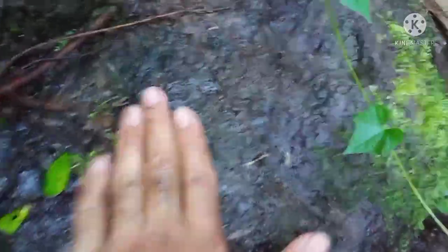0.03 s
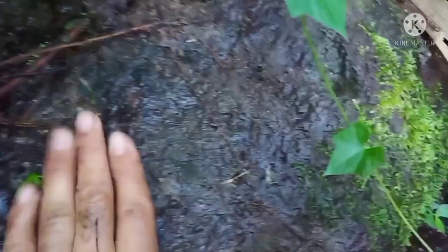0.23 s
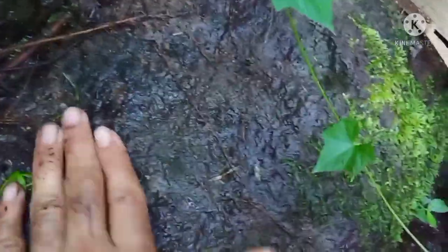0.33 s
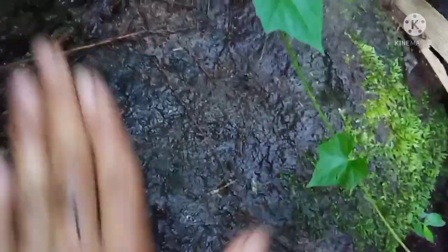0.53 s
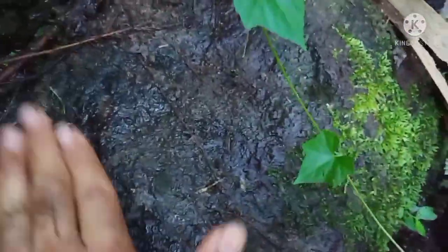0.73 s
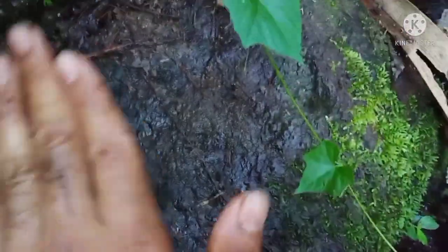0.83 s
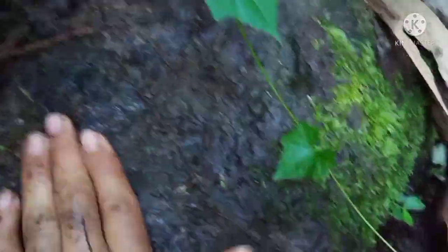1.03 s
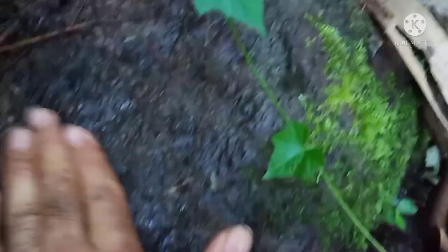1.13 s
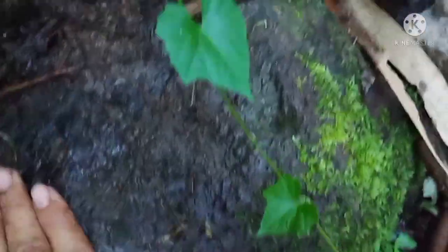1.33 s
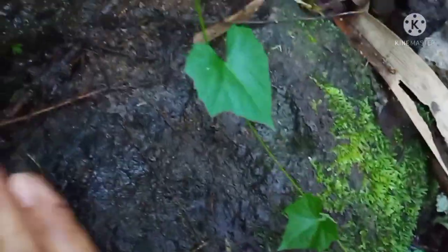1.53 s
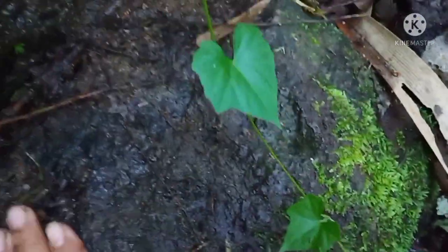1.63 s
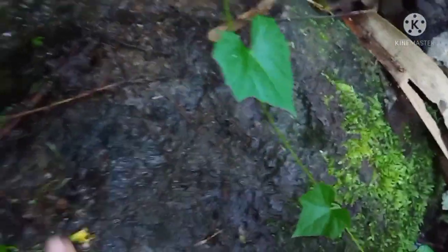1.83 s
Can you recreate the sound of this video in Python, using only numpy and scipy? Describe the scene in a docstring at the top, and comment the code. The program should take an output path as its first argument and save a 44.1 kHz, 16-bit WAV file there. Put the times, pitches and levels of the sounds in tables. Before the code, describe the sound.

A hand pats a wet rock five times over a steady high insect hiss.

```python
"""Insects hiss steadily over faint air, and a soft wet fizz fades out. From a quarter second in,
a flat hand pats a wet rock five times, close by. Each pat squeezes the water film into spatter,
pops a few air pockets and thuds in the palm. Tiny bubbles then crackle, drops tick and the
surroundings answer with a faint tail, while gain control briefly ducks the insects.
After the last pat the fizz swells again."""
import sys
import numpy as np
from scipy import signal
from scipy.fft import rfft, irfft
from scipy.io import wavfile
from scipy.ndimage import uniform_filter1d, minimum_filter1d

SR = 44100
rng = np.random.default_rng(int(sys.argv[2]) if len(sys.argv) > 2 else 0)


def waveform_to_disk(signal):
    """Save audio, clipped to [-1, 1], as 16-bit WAV at the path in sys.argv[1]."""
    frames = np.transpose(np.atleast_2d(signal))
    scaled = np.clip(frames, -1, 1) * 32767
    samples = np.round(scaled).astype(np.int16)
    wavfile.write(sys.argv[1], SR, samples)


N = 83790
TIME = np.arange(N) / SR


def amp(db):
    """Decibels to gain."""
    return 10 ** (np.asarray(db) / 20)


def unit(x):
    """Scales to rms 1."""
    return x / np.sqrt(np.mean(x ** 2) + 1e-20)


def curve(rows, hz, column=1):
    """One column of a table, interpolated along log frequency."""
    table = np.transpose(rows)
    return np.interp(np.log(hz + 1), np.log(table[0] + 1), table[column])


def fader(rows):
    """Gain that rides through points of seconds and dB."""
    return amp(np.interp(TIME, *np.transpose(rows)))


def add(mix, start, sound):
    """Mixes a sound in at a start in seconds."""
    part = mix[max(round(start * SR), 0):][:len(sound)]
    part += sound[:len(part)]


def low_cut(x, hz):
    """Rolls off the bass."""
    return signal.sosfilt(signal.butter(2, hz, "high", fs=SR, output="sos"), x)


def frame(size=4096):
    """Time from 20 ms before a contact, and the matching frequencies."""
    return np.arange(size) / SR - .02, np.fft.rfftfreq(size, 1 / SR)


def swell(t, rise, decay):
    """Builds ever faster up to time zero, then dies away."""
    return np.clip(1 + t / rise, 0, 1) ** 1.8 * np.exp(-np.maximum(t, 0) / decay)


def burst(envelope, colour_db):
    """Noise under an envelope, flattened in tone, then rung through a minimum-phase EQ."""
    spectrum = rfft(rng.standard_normal(len(envelope)) * envelope)
    spectrum /= np.sqrt(uniform_filter1d(abs(spectrum) ** 2, 41) + 1e-12)
    log_gain = np.log(amp(np.r_[colour_db, colour_db[-2:0:-1]]))
    eq = np.exp(np.conj(signal.hilbert(log_gain)))
    return irfft(spectrum * eq[:len(spectrum)])


def hiss(colour, flicker_db, size=512):
    """Steady coloured noise at rms 1 that flickers in patches of time and frequency."""
    hz = np.fft.rfftfreq(size, 1 / SR)
    real, imag, patches = rng.standard_normal((3, 4 * N // size + 6, len(hz)))
    patches = unit(uniform_filter1d(uniform_filter1d(patches, size=6, axis=0), size=14, axis=1))
    spectra = (real + 1j * imag) * amp(curve(colour, hz) + flicker_db * patches)
    return unit(signal.istft(spectra.T, nperseg=size, noverlap=size - size // 4)[1][:N])


# Tone of the air. Each row: frequency in Hz, relative level in dB.
AIR_COLOUR = [(30, -11), (100, -11.5), (250, -9), (700, -11), (1300, -10.5), (1750, -8.5), (2100, 7),
              (2450, 5), (2850, 4), (3200, -10), (4200, -15), (8000, -0.5), (11000, -15), (13000, -13),
              (15500, -5.5)]

def air():
    """A faint, wide bed of outdoor air."""
    return amp(-58.5) * hiss(AIR_COLOUR, flicker_db=2.2)


# Tone of the rumble. Each row: frequency in Hz, relative level in dB.
RUMBLE_COLOUR = [(20, -18.5), (45, -11.5), (75, 8), (115, 1), (170, -22), (300, -52)]
# Its fader ride. Each row: time in seconds, level in dB.
RUMBLE_RIDE = [(0, -63.5), (.09, -92), (.27, -78), (.34, -59.5), (.39, -85), (.44, -72.5), (.72, -94),
               (.82, -77), (.96, -71), (1.025, -49.5), (1.08, -83), (1.21, -66.5), (1.245, -51), (1.3, -76),
               (1.56, -96), (1.67, -62.5), (1.75, -86), (1.85, -67.5), (1.9, -85.5)]

def rumble():
    """Low handling noise comes and goes in soft bumps."""
    return fader(RUMBLE_RIDE) * hiss(RUMBLE_COLOUR, flicker_db=0, size=2048)


# Tone of the chorus. Each row: frequency in Hz, relative level in dB.
INSECT_COLOUR = [(3800, -35.5), (4400, -18.5), (4950, -7), (5700, -11), (6600, -13.5), (7100, 0), (7480, 2),
                 (8000, -1.5), (8450, -9.5), (9000, -32.5), (9800, -56.5)]

def insects():
    """An insect chorus blends into one high, shimmering hiss."""
    return amp(-43) * hiss(INSECT_COLOUR, flicker_db=1.5)


# Tone of the fizz. Each row: frequency in Hz, relative level in dB.
FIZZ_COLOUR = [(800, -23.5), (1800, -14), (2400, 6), (3200, -1.5), (6000, 4), (10000, -3), (15500, -7)]
# Its fader ride. Each row: time in seconds, level in dB.
FIZZ_RIDE = [(0, -50), (.035, -47), (.1, -56.5), (.2, -68.5), (1.6, -74.5), (1.69, -59), (1.76, -43.5),
             (1.84, -44), (1.9, -48.5)]

def fizz():
    """A soft wet fizz, strongest before and after the run of pats."""
    return fader(FIZZ_RIDE) * hiss(FIZZ_COLOUR, flicker_db=2.1)


# Near echoes and the far tail. Each row: frequency in Hz, level in dB, seconds to fall 60 dB.
NEAR_ECHOES = [(60, -24, .13), (170, -16, .13), (400, -13, .11), (800, -14, .115), (1150, -16, .125),
               (1700, -22, .12), (4000, -23, .06), (15000, -24, .05)]
FAR_TAIL = [(100, -61, .2), (900, -57, .25), (1310, -39.5, .3), (1660, -18, 0.36), (2050, -15, 0.37),
            (2920, -19, 0.35), (3460, -19.5, 0.38), (6000, -17.5, 0.54), (9000, -23.5, 0.59),
            (15000, -19.5, 0.21)]

def echo(x, bands, size=256):
    """The surroundings return a diffuse tail with its own level and decay in each band."""
    hz, t, spectra = signal.stft(rng.standard_normal(SR), SR, nperseg=size)
    t60 = np.maximum(curve(bands, hz, column=2), .01)[:, None]
    decay = amp(curve(bands, hz)[:, None] - 60 * t / t60)
    energy_trim = np.sqrt(2 * np.log(1000) / (t60 * SR))  # longer tails gain no energy
    tail = signal.istft(spectra * decay * energy_trim, SR, nperseg=size)[1]
    fade_in = np.minimum(np.arange(len(tail)) / SR / 0.015, 1)
    return signal.fftconvolve(x, tail * fade_in)[:N]


# Water ticks. Each row: time in seconds, pitch in Hz, peak level in dB, decay in seconds.
DRIP_TICKS = [(0.027, 3890, -34, 0.0034), (.027, 6850, -31, 0.0048), (0.3015, 6750, -25, .0012),
              (0.32, 6300, -28, .002), (0.6232, 2620, -27.5, 0.00102), (0.63, 6240, -31.5, 0.0017),
              (0.6653, 6600, -32.5, 0.001), (1.064, 9460, -32, .002), (1.085, 10000, -42, 0.004),
              (1.11, 10500, -43, 0.0041), (1.661, 9500, -47, 0.0011), (1.749, 10200, -37.5, .004)]

def drips(relative_width=0.14):
    """Drops tick in narrow bands of noise, mostly as the hand lifts."""
    out, (t, hz) = np.zeros(N), frame()
    for at, pitch, db, decay in DRIP_TICKS:
        band_db = -20 * np.log10(1 + ((hz / pitch - 1) / relative_width) ** 4)
        tick = burst(swell(t, rise=.0005, decay=decay), band_db)
        add(out, at + t[0], amp(db) * tick / abs(tick).max())
    return out


def crackle(bubbles_per_s=700, spread_db=7):
    """Tiny bubbles burst in the disturbed water film after each pat."""
    signs = rng.choice([-1, 1], N)
    strengths = amp(spread_db * np.minimum(rng.exponential(1, N), 3.5))
    popping = rng.random(N) < bubbles_per_s / SR
    clicks = unit(low_cut(signs * strengths * popping, 2500))
    envelope = sum(swell(TIME - contact - .05, rise=.05, decay=0.027) for contact, *_ in HAND_PATS)
    return amp(-48.5) * clicks * envelope


# Air pockets, one group per pat. Each row: pitch in Hz, level in dB, decay in seconds.
AIR_POCKETS = [
    [(1522, 2.5, .0018), (2020, -2, 0.004), (1280, -1, 0.0012), (2485, -3.5, 0.0013), (1112, -16, 0.0017)],
    [(1713, -6.5, .0015), (6330, -4, 0.0033), (950, -3.5, .0007), (2340, -6, 0.00046)],
    [(1484, -11, 0.0047), (2264, -6, 0.0036), (3540, -5.5, 0.0019), (4520, -8, 0.0042)],
    [(1479, 2.5, 0.0024), (1914, -7, 0.0012), (1070, -2.5, .0017)],
    [(1263, 1, 0.00092), (3504, 2, .0012), (2708, 1.5, 0.00063), (1823, -4.5, 0.0014), (4060, -6, 0.0018)],
]

def pockets(lead_s=0.00017):
    """Air trapped under the hand rings briefly as it escapes."""
    out, (t, _) = np.zeros(N), frame()
    for (contact, *_), trapped in zip(HAND_PATS, AIR_POCKETS):
        for hz, db, decay in trapped:
            ring = np.sin(2 * np.pi * (hz * t + rng.random()))
            add(out, contact - lead_s + t[0], amp(db) * swell(t, rise=.002, decay=decay) * ring)
    return out


# Modes of the thud. Each row: pitch in Hz, relative level in dB, seconds to fall 60 dB.
THUD_MODES = [(150, -32, .07), (220, -21, .04), (295, -22, .045), (372, -17, .08), (510, -26, .025),
              (660, -28, .025)]

def thud():
    """Palm and stone knock in a few low, quickly damped tones."""
    t = np.arange(SR // 4) / SR
    modes = sum(amp(db - 60 * t / t60) * np.sin(2 * np.pi * hz * t) for hz, db, t60 in THUD_MODES)
    return low_cut(modes, 130)


# Tone of the spatter. Each row: frequency in Hz, relative level in dB.
SPATTER_COLOUR = [(40, -33.5), (150, -27), (350, -4), (750, -9), (1100, -5.5), (1700, 0), (2400, -0.5),
                  (3600, -3.5), (4800, -7.5), (6400, -3.5), (8500, -8), (12000, -13.5), (15500, -15.5)]
# Fingers that land late. Each row: contact in seconds, gain in dB, closing time and decay in seconds.
FINGER_SLAPS = [(0.5858, -14, .0015, 0.0017), (0.9603, -11, .003, 0.0033), (1.297, -13, .002, .002),
                (1.6055, -16, .001, .0015)]
# The five pats. Each row: full contact, closing time and spatter decay in seconds,
# then spatter gain, treble shelf, body shelf and thud gain in dB.
HAND_PATS = [(.2430, 0.0045, 0.0027, 3, -1, 3.5, -8.5), (0.5792, 0.0025, 0.0016, -0.5, 6, 1.5, -5),
             (0.9516, 0.004, 0.0023, 2.5, 0.5, 2, -17), (1.2878, 0.0029, 0.002, 4.5, 0.5, 2, 1),
             (1.6000, 0.0029, 0.0026, 1.5, 6, 3.5, -0.5)]

def pats(body_hz=900, treble_hz=5100):
    """The water film spatters as palm and fingers close on it, and the palm thuds."""
    out, (t, hz) = np.zeros(N), frame()
    spatter_db = 21.5 + curve(SPATTER_COLOUR, hz)
    treble = hz ** 4 / (hz ** 4 + treble_hz ** 4)
    body = body_hz ** 4 / (hz ** 4 + body_hz ** 4)
    for contact, closing, decay, db, treble_db, body_db, thud_db in HAND_PATS:
        slap = swell(t, closing, decay)
        squelch = amp(-22) * swell(t, closing, decay=0.0085)
        colour_db = spatter_db + db + treble_db * treble + body_db * body
        add(out, contact + t[0], burst(slap + squelch, colour_db))
        add(out, contact - closing / 2, amp(thud_db) * thud())
    for contact, db, closing, decay in FINGER_SLAPS:
        thin_db = spatter_db + db - 9 * body - 2 * treble
        add(out, contact + t[0], burst(swell(t, closing, decay), thin_db))
    return out


def scene():
    """The hand, its echoes and the life around it, in mono."""
    hand, pops = pats(), pockets()
    echoes = echo(hand + pops, NEAR_ECHOES) + echo(hand + amp(-6) * pops, FAR_TAIL)
    return (hand + pops + echoes + drips() + crackle() + insects() + air() + rumble() + fizz())[None]


def duck(x, threshold_db=-32, slope=0.26, hold_s=0.032, recover_db_per_s=136, size=400):
    """Gain control dips the whole mix at each pat, holds, then recovers."""
    level_db = 10 * np.log10(abs(uniform_filter1d(x[0] ** 2, size)) + 1e-12)
    cut_db = slope * np.maximum(level_db - threshold_db, 0)
    hold = int(hold_s * SR)
    held_db = -minimum_filter1d(-cut_db, hold, origin=(hold - 1) // 2)
    recovery_db = TIME * recover_db_per_s
    released_db = np.maximum.accumulate(held_db + recovery_db) - recovery_db
    return x * amp(-uniform_filter1d(released_db, size // 2))


# Reach of the noise suppressor. Each row: frequency in Hz, deepest cut in dB.
SUPPRESSOR_DEPTH = [(130, 2.5), (280, 6), (1000, 5), (1350, 2), (1700, 0.5)]

def suppress(x, threshold_db=-68, knee_db=2.5):
    """A noise suppressor pulls down the low mids wherever they get faint, cutting the tails short."""
    hz, _, spectra = signal.stft(x, SR, nperseg=512, noverlap=384)
    power = uniform_filter1d(uniform_filter1d(abs(spectra) ** 2, size=3, axis=1), size=3, axis=2)
    level_db = 10 * np.log10(abs(power) + 1e-16)
    faint = .5 - .5 * np.tanh((level_db - threshold_db) / (2 * knee_db))
    gain = amp(-faint * curve(SUPPRESSOR_DEPTH, hz)[:, None])
    return signal.istft(spectra * gain, SR, nperseg=512, noverlap=384)[1][:, :N]


def record(dry, top_hz=15900):
    """The mix is ducked, faint tails are trimmed, peaks round off and the very top is cut."""
    ducked = suppress(duck(dry))
    rounded = ducked / (1 + ducked ** 8) ** (1 / 8)
    high_cut = signal.firwin(255, top_hz, window=("kaiser", 8), fs=SR)
    return signal.oaconvolve(rounded, high_cut[None], "same")


dry = scene()
out = record(dry)
waveform_to_disk(out)
```